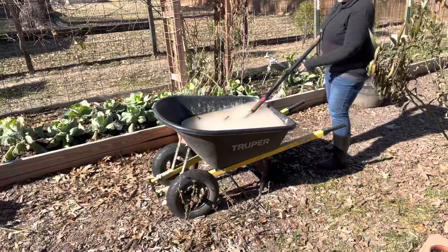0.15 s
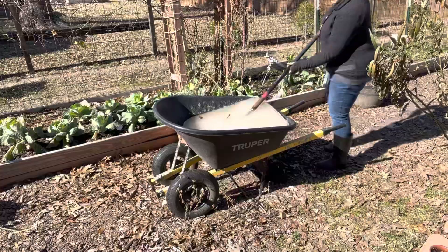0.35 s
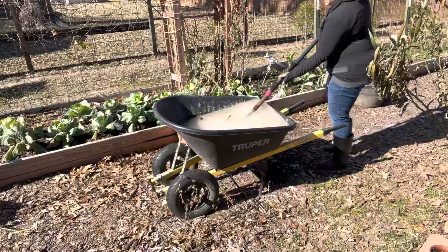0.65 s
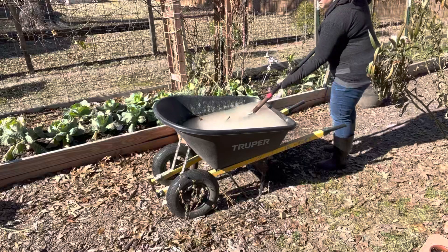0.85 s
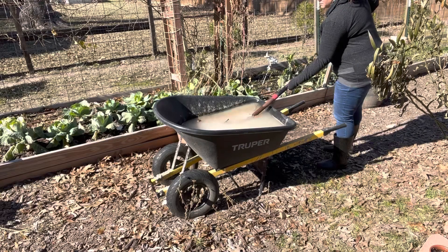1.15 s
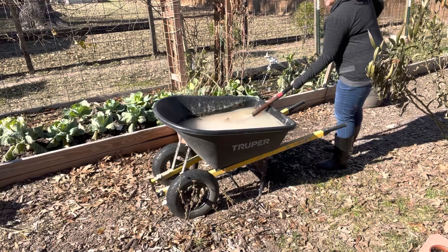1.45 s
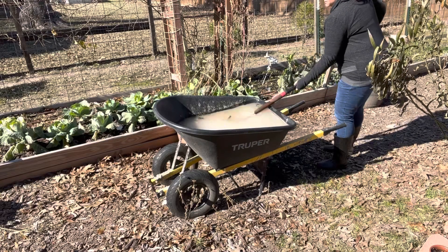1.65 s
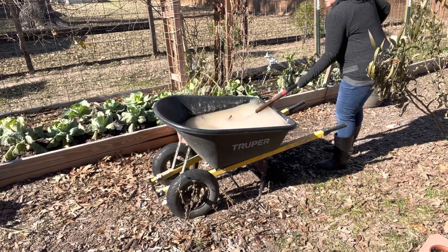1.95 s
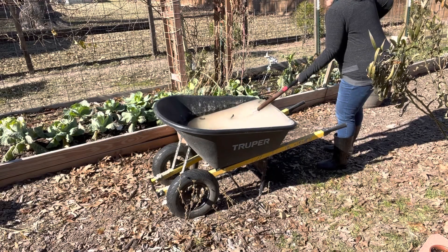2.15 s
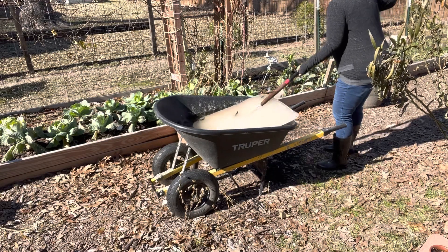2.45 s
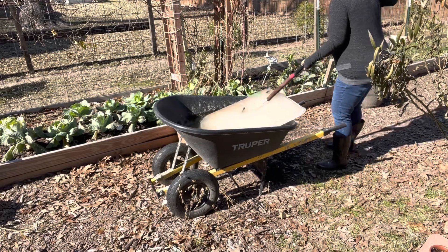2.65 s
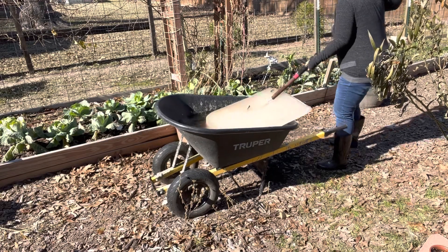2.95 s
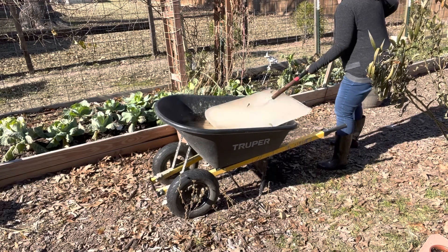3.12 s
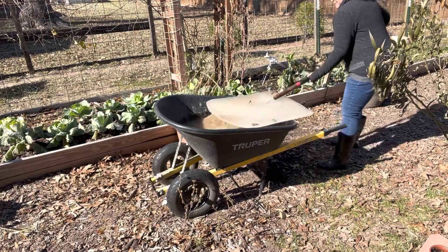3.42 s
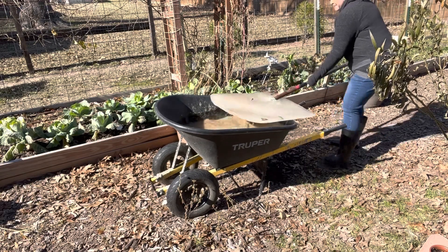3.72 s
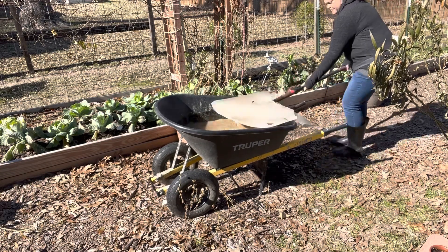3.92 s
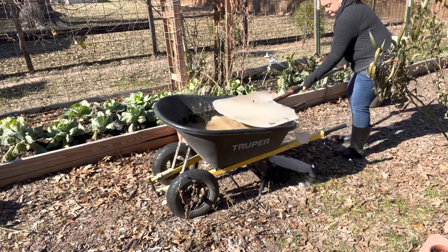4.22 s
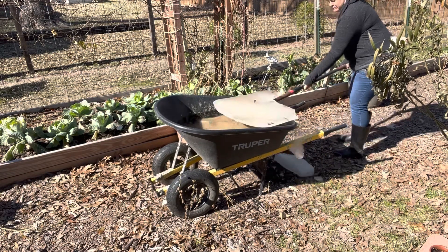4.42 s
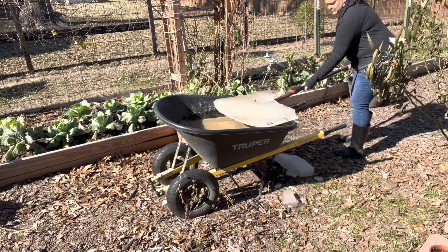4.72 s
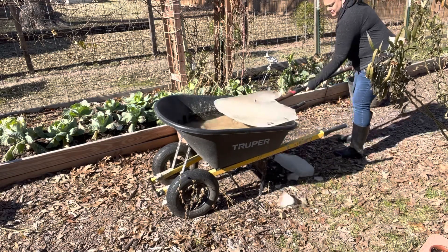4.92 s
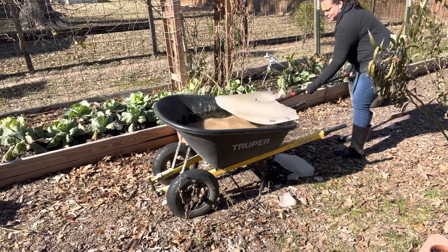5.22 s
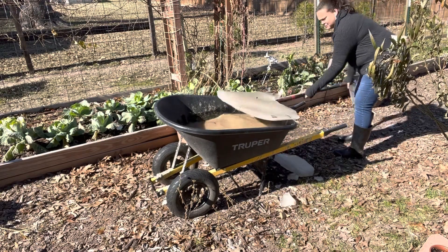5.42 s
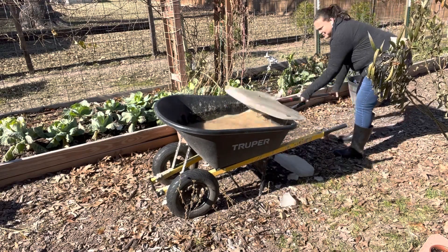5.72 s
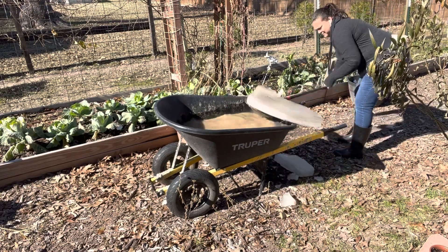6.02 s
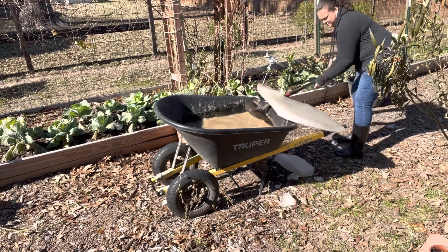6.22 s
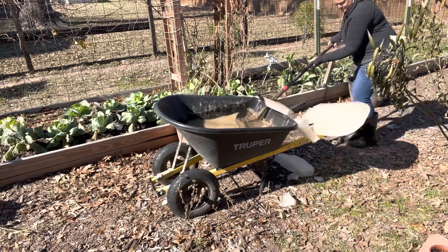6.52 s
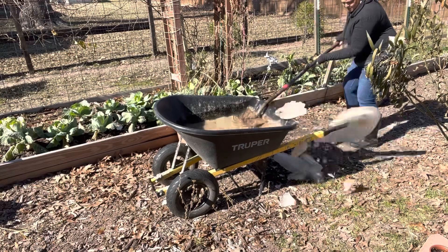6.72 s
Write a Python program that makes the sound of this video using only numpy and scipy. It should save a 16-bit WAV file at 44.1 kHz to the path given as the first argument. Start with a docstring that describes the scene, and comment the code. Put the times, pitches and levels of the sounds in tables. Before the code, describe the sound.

A steady low outdoor rumble with a trace of hiss lies beneath close, detailed stereo sound. From 0 to 1.3 s a shovel works at an ice slab in a plastic wheelbarrow: a soft bump, light gritty scraping, and a cluster of hard clacks and a watery plop near 0.6-0.8. Short falling chirps come at about 1.4, then hollow knocks at 1.6-1.7, 2.3 and 2.7, with tiny drips and ticks. Scraping strengthens near 3.8, and at 3.9-4.25 knocks, crisp leaf crackle, a faint steel ring and a low thud mark falling pieces. Small cracks follow to 4.65, then near quiet with a faint squeak at 5. Grinding returns from 5.6, growing rough at 6.1. A loud hollow knock hits at 6.23, heavy thuds and snaps at 6.4-6.55, then the hardest clacks and final thud at 6.7-6.85, with a short garden echo.

```python
"""A frozen slab is levered out of a plastic wheelbarrow with a shovel, in a garden.
The slab knocks (short fading tones), grinds (showers of tiny grains) and chirps (unsteady sliding tones).
Water plops beneath it, chips tick, the blade rings faintly, and pieces crash on dry leaves (noise bursts).
Two close microphone ports hear it with a short echo, over a low outdoor rumble made of coloured noise."""
import sys
import numpy as np
from scipy import signal
from scipy.fft import rfft, irfft, next_fast_len
from scipy.io import wavfile
from scipy.ndimage import uniform_filter1d

SR = 44100
rng = np.random.default_rng(int(sys.argv[2]) if len(sys.argv) > 2 else 0)


def unload_wav(signal):
    """Save mono or channel-first audio to the path in sys.argv[1] as 16-bit WAV at rate SR, clipped to [-1, 1]."""
    wavfile.write(
        sys.argv[1],
        SR,
        np.round(np.clip(np.atleast_2d(signal).T, -1, 1) * 32767).astype(np.int16),
    )


N = 302746
AGE = np.arange(SR // 8) / SR  # seconds since a short sound began

# Background. Spectra give the relative strength per hertz: f/Hz, level/dB
AIR_SPECTRUM = [(22, -18.5), (52, -1.5), (92, 2.5), (150, -10), (220, -20.5), (1400, -36.5), (2700, -81),
                (9000, -38.5), (15000, -102)]
AIR_DB = -49
ECHO_SPECTRUM = [(1500, 0.21), (15000, 0.35)]
ECHO_DB = -11.5

# The two ports, how alike they sound: f/Hz, likeness/0-1
PORT_LIKENESS = [(120, 0.93), (450, 0.61), (1200, 0.93), (3000, 0.31), (7000, 0.25), (9400, 0.92),
                 (15000, 1)]
# The two ports, how far the left leads (below the first f the lead shrinks towards 0): f/Hz, lead/rad
PORT_LEAD = [(1500, 0.6), (2600, -2.1), (4200, -1.5), (6500, -5), (8000, -2), (9500, -3), (15500, -2.5)]
TOP_HZ = 15900  # upper band limit

# Bubbles, drops and small pitched ticks of chips: t/s, level/dB, f/Hz, decay/s
PLOPS = [(0.657, -35.5, 1280, 0.0044), (1.103, -33, 1217, 0.0026), (1.847, -33, 3370, 0.00085),
         (1.866, -35, 1370, 0.0014), (1.958, -41.5, 1350, 0.0039), (1.994, -40.5, 3370, 0.00098),
         (2.114, -42, 3270, 0.0017), (2.536, -40, 797, 0.023), (3.514, -40.5, 2650, 0.0063),
         (3.529, -43.5, 1036, 0.018), (5.24, -46, 1064, 0.015), (5.366, -49.5, 1460, 0.0066)]
PLOP_TICK_DB = -52.5  # faint click at the start of each, before colouring

# Heavy pieces land: t/s, level/dB, f/Hz, time to swell/s
THUDS = [(4.238, -21, 120, 0.0068), (6.44, -10.5, 180.7, 0.0042), (6.549, -26, 127, 0.012),
         (6.844, -10.5, 114, 0.0031)]

# Blows that ring the steel blade: t/s, level/dB
BLADE_BLOWS = [(4.015, -29.5), (4.109, -34), (6.545, -26.5), (6.592, -44)]
# Tones of the blade: f/Hz, relative level/dB, time to fall by 60 dB/s
BLADE_TONES = [(1030, -5, 0.15), (1617, -6, 0.36), (1653, -5, 0.64), (1827, -3, 0.24), (3330, -11.5, .25),
               (4080, -10, 0.22), (4830, -17, .22)]

# The loudest brittle snaps: t/s, level before colouring/dB, decay/s
SNAPS = [(0.804, -41.5, 0.027), (1.166, -43, 0.023), (1.304, -28.5, 0.0018), (1.52, -38, 0.0033),
         (2.528, -34, 0.003), (2.874, -38, 0.0062), (3.073, -40.5, 0.012), (3.953, -28.5, 0.0018),
         (4.012, -20, 0.015), (4.344, -22.5, 0.0015), (4.3795, -29, 0.001), (4.638, -35, 0.0066),
         (6.274, -21.5, 0.0046), (6.413, -17, 0.0027), (6.52, -13, 0.0078), (6.615, -28, 0.0027),
         (6.826, -18.5, 0.0031)]
# Dry leaves are crushed with a thin, high crackle: t/s, level before colouring/dB, decay/s
CRACKLES = [(0.274, -37, 0.014), (4.014, -10.5, 0.0073), (4.1762, -15, 0.0088), (6.174, -16, 0.0081),
            (6.554, -11.5, 0.0052)]
CRACKLE_LOW_HZ = 9700
# Colour of ice, leaves and chips: f/Hz, relative level/dB
CRISP_SPECTRUM = [(500, -1), (2300, -2), (4000, -0.5), (8600, 1.5), (10000, -5), (13000, -13.5),
                  (15700, -3.5)]

# Colour of the rumble after a boom: f/Hz, relative level/dB
TUB_SPECTRUM = [(25, -27), (68, 1.5), (110, -3.5), (190, -3.0), (400, -16.5), (2000, -36.0)]
SHUDDER_DB = -17.5  # relative to the booms

# Pushes of the shovel that slide the slab: start t/s, length/s, grinding level/dB, rustle level/dB
STROKES = [(0.037, 0.046, -44.5, -45.5), (0.148, 0.51, -53.5, -63), (0.55, 0.24, -54.5, -55),
           (0.913, 0.12, -59.5, -56.5), (1.125, 0.73, -49, -61), (1.629, 0.051, -41.5, -48),
           (1.94, 0.66, -53.5, -61.5), (2.456, 0.66, -49, -58.5), (3.25, 1, -57, -53.5),
           (3.732, 0.55, -41.5, -42.5), (4.158, 0.28, -51, -44.5), (4.427, 0.42, -60, -55),
           (5.609, 0.49, -57.5, -60), (5.767, 0.3, -45, -55), (6.08, 0.27, -37, -61),
           (6.186, 0.51, -38.5, -44), (6.515, 0.067, -27.5, -34), (6.694, 0.25, -34.5, -34)]
STROKE_RISE_SHARE = 0.12  # of the length: a long push takes longer to get going
GRIND_FALL_S, RUSTLE_FALL_S = 0.045, 0.037  # fading after a push
REST_GRIND_DB, REST_RUSTLE_DB = -70, -67  # the slab never lies quite still
# Slips grow with the push: grinding level/dB, part of the sound power that comes in sudden slips/0-1
CATCHING = [(-44.5, 0.26), (-38.5, 0.37)]
# Colour of the slab grinding in the tub: f/Hz, relative level/dB
GRIND_SPECTRUM = [(90, -0.5), (200, -4.5), (400, 2.5), (600, -3), (950, -3.5), (1650, -11), (2500, -21),
                  (5000, -38)]

# The wet slab catches on the plastic and chirps: t/s, length/s, level/dB, middle pitch f/Hz
RUBS = [(1.392, 0.032, -32, 305.5), (1.452, 0.02, -38.5, 535), (1.469, 0.024, -34.5, 463),
        (4.969, 0.13, -54.5, 809)]

# A hard edge of ice strikes ice or steel: t/s, clack level/dB, clack f/Hz, crunch before colouring/dB, decay/s
CLACKS = [(0.6202, -23, 940, -52, 0.0053), (0.634, -34, 1150, -34.5, 0.0023),
          (0.698, -29.5, 980, -33.5, 0.0055), (0.77, -25.5, 1240, -28.5, 0.0023),
          (0.8291, -30.5, 996, -37, 0.0044), (1.643, -40, 1420, -51, 0.0093),
          (1.679, -27, 1620, -45, 0.0043), (2.216, -43, 1010, -46.5, .006),
          (2.67, -29.5, 1275, -36.5, 0.0099), (3.655, -36.5, 855, -41.5, 0.0053),
          (3.794, -32, 795, -33, 0.0085), (4.02, -18, 1036, -21, 0.0077), (4.1117, -14.5, 830, -46, 0.012),
          (4.153, -22.5, 930, -35, 0.01), (4.167, -26.5, 1070, -23.5, 0.0092),
          (4.2328, -15.5, 975, -48, 0.0026), (6.057, -45, 910, -39.5, 0.0043),
          (6.5445, -17.5, 979, -15.5, 0.0072), (6.706, -20, 1230, -20.5, 0.002),
          (6.723, -8.5, 885, -11, 0.0026), (6.7821, -17.5, 590, -30, 0.0017),
          (6.801, -27, 1180, -20, 0.005), (6.83, -14, 990, -21, 0.0023), (6.835, -16.5, 983, -19.5, 0.0056)]
EDGE_BOOM_DB, EDGE_BOOM_HZ = -15, 498  # such a tap hardly moves the tub; dB relative to its clack

# The slab bumps the tub: t/s, boom level/dB, tub f/Hz, slab f/Hz, hardness/0-1,
# delay of a second, weaker boom/s (0: none); the shortest ones merge with the first
KNOCKS = [(0.052, -34, 252, 894, 0.56, 0.0047), (1.386, -37, 318, 853, 0.49, 0.0049),
          (1.612, -35.5, 303, 643, 0.57, 0.037), (1.675, -25, 423, 775, 0.46, 0.0013),
          (1.706, -25.5, 320, 830, 0.57, 0), (1.796, -42, 400, 1440, 1, 0.0022),
          (2.317, -26.5, 395, 772, 0.71, 0), (2.7118, -22.5, 332, 720.6, 0.23, 0.039),
          (2.964, -37.5, 272, 662, 0, 0.0034), (3.115, -34.5, 230.1, 763, 0, 0.0038),
          (3.377, -42.5, 588, 695, 1, 0.0044), (3.866, -29, 235, 906.5, 0.4, 0),
          (3.913, -18.5, 218.1, 952.6, 0.56, 0.013), (4.002, -19, 380, 692, 0.33, 0.012),
          (4.111, -17, 436.6, 980, 0.67, 0), (4.445, -38.5, 416, 761, 0.69, 0),
          (4.6219, -33, 442, 927, 0.84, 0), (5.5105, -37, 289, 816, 0.39, 0.0017),
          (5.825, -34, 191.7, 1181, 0.79, 0.007), (5.971, -31, 206.3, 722, 0.58, 0.0033),
          (6.098, -23, 217.8, 959.5, 0.34, 0.00074), (6.2258, -11.5, 379.9, 953, 0.61, 0.00042),
          (6.256, -21, 267.5, 952, 0.61, 0.0011), (6.337, -24.5, 333, 779, 0.43, 0.0013),
          (6.412, -17.5, 447, 1079, 0.65, 0.0078), (6.521, -13, 331, 634, 0.33, .035)]
SECOND_DB, SECOND_PITCH = -4, 0.891  # second boom relative to the first: level change and pitch factor
# A hard contact is short and bright; a soft one is duller and lasts longer (dB relative to the boom)
HARD_CLACK_DB, SOFT_CLACK_DB = 4, -12
HARD_CRUNCH_DB, SOFT_CRUNCH_DB = 3, -32
HARD_DECAY_S, SOFT_DECAY_S = 0.0064, 0.013
BOOM_RISE_SHARE, CLACK_RISE_SHARE = 0.21, 0.072  # of the decay: softer contacts also start more slowly
CLINK_DB, CLINK_RATIO = -19, 3.7  # the slab's edge rings above its clack: level and pitch relative to it


def amp(db):
    """Turns dB into a gain."""
    return 10 ** (np.asarray(db) / 20)


def evened(x):
    """Scales to an rms (average strength) of 1."""
    return x / np.sqrt(np.mean(x ** 2) + 1e-20)


def read(points, hz):
    """Reads between table points, with frequency on a log scale."""
    f, value = np.transpose(points)
    return np.interp(np.log(hz + 1), np.log(np.abs(f) + 1), value)


def add(mix, s, sound):
    """Mixes a sound in at time s, in seconds."""
    part = mix[..., max(round(s * SR), 0):][..., :sound.shape[-1]]
    part += sound[..., :part.shape[-1]]


def coloured(pair, spectrum):
    """Colours two signals and blends them so that two unrelated ones become as alike as the ports."""
    size = next_fast_len(N + 4096)
    hz = np.fft.rfftfreq(size, 1 / SR)
    a, b = rfft(pair, size) * evened(amp(read(spectrum, hz)))
    alike = np.clip(read(PORT_LIKENESS, hz), 0, 1)
    common = a * np.sqrt((1 + alike) / 2)
    apart = b * np.sqrt((1 - alike) / 2)
    return irfft(np.array([common + apart, common - apart]), size)[:, :N]


def grains(count, per_s, spread_db):
    """Tiny random contacts of uneven size, as sparse clicks on two channels."""
    size = amp(spread_db * np.minimum(rng.exponential(1, count), 4))
    present = rng.random(count) < per_s / SR
    return evened(size * present * rng.standard_normal((2, count)))


def dying(x, decay, rise):
    """Makes x swell and die away, with the energy of a unit-rms sound of that decay."""
    x = x * np.exp(-AGE / decay) * (1 - np.exp(-AGE / rise))
    return evened(x) * np.sqrt(decay / 2 * SR / len(AGE))


def speckled(x, depth_db):
    """Every fragment has its own colour: a gain that varies in small patches of time and frequency."""
    z = signal.stft(x, nperseg=256)[2]
    patches = rng.standard_normal(z.shape[1:])
    for axis, size in ((0, 5), (0, 4), (1, 4), (1, 3)):  # axis 0 is frequency, 1 is time
        patches = uniform_filter1d(patches, size, axis)
    gain = evened(amp(depth_db * evened(patches)))
    return signal.istft(z * gain, nperseg=256)[1][:, :N]


def air():
    """Steady outdoor rumble with a trace of hiss, from coloured noise."""
    return amp(AIR_DB) * coloured(rng.standard_normal((2, N)), AIR_SPECTRUM)


def garden(x, t60=0.11):
    """Ground, bed boards and fence scatter a thin, short echo: many random copies that fade."""
    t = np.arange(SR // 2) / SR
    taps = rng.standard_normal((2, len(t))) * (rng.random((2, len(t))) < 2500 / SR)
    taps *= amp(-60 * t / t60) * (1 - np.exp(-t / 0.0023))
    taps /= np.linalg.norm(taps, axis=1, keepdims=True)
    tail = signal.fftconvolve(x.mean(0)[None], taps, axes=1)[:, :N]
    return coloured(tail, ECHO_SPECTRUM)


def plops():
    """Bubbles, drops and small ticks of chips ring briefly, each at one pitch."""
    out = np.zeros(N)
    for s, db, hz, decay in PLOPS:
        ring = np.sin(2 * np.pi * hz * AGE)
        add(out, s, amp(db) * dying(ring, decay, rise=0.00019))
    return out


def thuds():
    """The ground takes a heavy piece with a low swing that swells and dies smoothly."""
    out = np.zeros(N)
    for s, db, hz, swell in THUDS:
        push = (AGE / swell) ** 2 * np.exp(2 - 2 * AGE / swell)  # peaks at 1 after the swell time
        add(out, s, amp(db) * push * np.sin(2 * np.pi * hz * AGE))
    return out


def blade():
    """The steel blade rings at several fixed tones, each fading at its own pace."""
    t = np.arange(SR // 2) / SR
    ring = sum(amp(db - 60 * t / t60) * np.sin(2 * np.pi * hz * t) for hz, db, t60 in BLADE_TONES)
    out = np.zeros(N)
    for s, db in BLADE_BLOWS:
        add(out, s, amp(db) * ring)
    return out


def crunches(contacts):
    """Snaps, crushed leaves and blows set off showers of tiny fractures; each plop starts with a click."""
    out = np.zeros((2, N))
    for s, db, decay in SNAPS:
        shower = grains(len(AGE), per_s=4000, spread_db=-1.0)
        add(out, s, amp(db) * dying(shower, decay, rise=0.00029))
    thin = signal.butter(2, CRACKLE_LOW_HZ, "highpass", fs=SR)
    for s, db, decay in CRACKLES:
        shower = signal.lfilter(*thin, grains(len(AGE), per_s=18000, spread_db=1))
        add(out, s, amp(db) * dying(shower, decay, rise=decay / 10))
    for s, *_, db, decay in contacts:
        shower = grains(len(AGE), per_s=6000, spread_db=5.5)
        add(out, s - .0005, amp(db) * dying(shower, decay, rise=0.00098))  # just ahead of the blow
    for s, *_ in PLOPS:
        tick = dying(rng.standard_normal((2, len(AGE))), 0.0013, rise=0.00025)
        add(out, s, amp(PLOP_TICK_DB) * tick)
    return coloured(speckled(out, depth_db=4.0), CRISP_SPECTRUM)


def shudder(contacts, decay=0.074):
    """Tub and ground rumble on for a moment after each boom."""
    power, t = np.zeros(N), np.arange(SR // 4) / SR
    for s, boom_db, *_ in contacts:
        swell = np.exp(-t / decay) * (1 - np.exp(-t / 0.011))
        add(power, s, (amp(boom_db) * swell) ** 2)
    rumble = coloured(rng.standard_normal((2, N)), TUB_SPECTRUM)
    return amp(SHUDDER_DB) * np.sqrt(power) * rumble


def sliding():
    """Gains of grinding and rustle: each push takes hold, keeps its strength and dies away."""
    power = amp([[REST_GRIND_DB], [REST_RUSTLE_DB]]) ** 2 * np.ones(N)
    t = np.arange(SR) / SR
    for start, length, grind_db, rustle_db in STROKES:
        attack = np.minimum(t / (STROKE_RISE_SHARE * length), 1)
        release = np.exp(-np.maximum(t - length, 0) / np.array([[GRIND_FALL_S], [RUSTLE_FALL_S]]))
        add(power, start, (amp([[grind_db], [rustle_db]]) * attack * release) ** 2)
    return np.sqrt(power)


def slips(per_s, spread_db, decay, share):
    """A gain for steady rubbing plus sudden slips that die away; share is the slips' part of the power."""
    kicks = grains(N, per_s, spread_db)[0] ** 2
    power = signal.lfilter([1], [1, -np.exp(-2 / (decay * SR))], kicks)
    share = np.clip(share, 0, 1)
    return np.sqrt(1 - share + share * power / power.mean())


def friction(grind_gain, rustle_gain):
    """The slab grinds along the tub in uneven slips while leaves and chips rustle."""
    catching = np.interp(20 * np.log10(grind_gain), *np.transpose(CATCHING))
    grind = grains(N, per_s=4000, spread_db=-0.5)
    grind = grind * slips(per_s=210, spread_db=-1.0, decay=0.021, share=catching)
    rustle = grains(N, per_s=9000, spread_db=-5.0)
    rustle = rustle * slips(per_s=130, spread_db=4.5, decay=0.0055, share=0.46)
    grind = speckled(coloured(grind, GRIND_SPECTRUM), depth_db=4.0)
    rustle = speckled(coloured(rustle, CRISP_SPECTRUM), depth_db=4.0)
    return grind * grind_gain + rustle * rustle_gain


def ticks(gain, count, low_hz, high_hz, cycles, level_db, spread_db=3):
    """Small contacts ring for a few cycles at a random pitch, louder when the slab moves more."""
    out = np.zeros((2, N))
    for when, pitch, size, turn in rng.random((count, 4)):
        at = when * (N - 1) / SR
        hz = low_hz * (high_hz / low_hz) ** pitch
        db = level_db + spread_db * min(-np.log(1 - size), 3)
        out_of_step = np.array([[1], [-1]]) * (turn - .5)  # radians, opposite at the two ports
        ping = np.sin(2 * np.pi * hz * AGE + out_of_step)
        add(out, at, gain[int(at * SR)] * amp(db) * dying(ping, cycles / hz, rise=0.00052))
    return out


def rubs(sag=0.189, rough=0.068, overtone_db=-9, stutter_db_per_s=45, drift_per_s=0.47):
    """Stick and slip: an unsteady falling tone with two overtones; longer rubs stutter and drift more."""
    out = np.zeros(N)
    for s, length, db, hz in RUBS:
        done = np.minimum(AGE / length, 1)  # the pitch falls as the slab slows
        wobble = evened(uniform_filter1d(rng.standard_normal(len(AGE)), size=60))
        drift, stutter = evened(uniform_filter1d(rng.standard_normal((2, len(AGE))), size=500))
        pitch = hz * (1 + sag * (.5 - done) + rough * wobble + drift_per_s * length * drift)
        turns = np.cumsum(pitch) / SR
        tone = sum(amp(k * overtone_db) * np.sin(2 * np.pi * (k + 1) * turns) for k in range(3))
        flutter = evened(amp(stutter_db_per_s * length * stutter))
        add(out, s, amp(db) * np.sin(np.pi * done) * flutter * tone)
    return out


def blows():
    """Lists every contact, second ones too: t/s, boom/dB, boom/Hz, clack/dB, clack/Hz, crunch/dB, decay/s."""
    out = []
    for s, db, hz, crunch_db, decay in CLACKS:
        out.append((s, db + EDGE_BOOM_DB, EDGE_BOOM_HZ, db, hz, crunch_db, decay))
    for s, db, tub_hz, slab_hz, hardness, delay in KNOCKS:  # hardness blends soft into hard
        clack_db = np.interp(hardness, [0, 1], [SOFT_CLACK_DB, HARD_CLACK_DB])
        crunch_db = np.interp(hardness, [0, 1], [SOFT_CRUNCH_DB, HARD_CRUNCH_DB])
        decay = np.interp(hardness, [0, 1], [SOFT_DECAY_S, HARD_DECAY_S])
        touches = [(s, db, tub_hz)]
        if delay > 0:
            touches.append((s + delay, db + SECOND_DB, tub_hz * SECOND_PITCH))
        for at, level, hz in touches:
            out.append((at, level, hz, level + clack_db, slab_hz, level + crunch_db, decay))
    return out


def struck(hz, decay, rise, low_hz, high_hz, scatter, width, sag=0.11, damping=0.32, db_per_octave=-3):
    """A struck body: one main tone sagging in pitch amid a crowd of weaker ones; high ones die first."""
    place, start, offset = rng.random((3, 16, 1))
    step = (np.arange(len(place))[:, None] + place) / len(place)
    crowd_hz = low_hz * (high_hz / low_hz) ** step
    weight = amp(db_per_octave * np.abs(np.log2(crowd_hz / hz)))
    weight = weight * np.exp(AGE / decay * (1 - (crowd_hz / hz) ** damping))
    crowd = []
    for side in (-1, 1):  # each tone reaches the ports a little out of step
        turns = crowd_hz * AGE + start + side * width * (offset - .5)
        crowd.append((weight * np.sin(2 * np.pi * turns)).sum(0))
    pitch = hz * (1 + sag * (2 * np.exp(-AGE / decay) - 1))
    main = dying(np.sin(2 * np.pi * np.cumsum(pitch) / SR), decay, rise)
    return evened(main + scatter * dying(np.array(crowd), decay, rise)) * np.std(main)


def knocks(contacts):
    """Each blow gives a hard clack of the slab, a clink of its edge and a slower-rising hollow boom."""
    out = np.zeros((2, N))
    for s, boom_db, boom_hz, clack_db, clack_hz, _, decay in contacts:
        clack_rise = decay * CLACK_RISE_SHARE
        boom = struck(boom_hz, decay, rise=decay * BOOM_RISE_SHARE,
                      low_hz=163.6, high_hz=642.5, scatter=0.92, width=0.049)
        clack = struck(clack_hz, decay, rise=clack_rise,
                       low_hz=667.7, high_hz=2073, scatter=0.96, width=0.1)
        clink = struck(clack_hz * CLINK_RATIO, decay, rise=clack_rise / 2,
                       low_hz=2853, high_hz=5590, scatter=1.2, width=0.3)
        add(out, s, amp(boom_db) * boom + amp(clack_db) * (clack + amp(CLINK_DB) * clink))
    return out


def scene():
    """The work at the wheelbarrow, its short echo and the open air."""
    contacts = blows()
    grind_gain, rustle_gain = sliding()
    work = plops() + thuds() + blade() + crunches(contacts) + shudder(contacts)
    work = work + friction(grind_gain, rustle_gain)
    # the slab skips over grit
    work = work + ticks(grind_gain, count=330, low_hz=514, high_hz=1935, cycles=3.3, level_db=-3)
    # drops and chips land
    work = work + ticks(rustle_gain, count=400, low_hz=2807, high_hz=8100, cycles=9.1, level_db=-2.5)
    work = work + rubs() + knocks(contacts)
    return work + amp(ECHO_DB) * garden(work) + air()


def record(dry, bass_hz=40):
    """The ports lose the deepest bass and hear the treble out of step, the right louder; then a band limit."""
    size = next_fast_len(N + 4096)
    hz = np.fft.rfftfreq(size, 1 / SR)
    # long waves reach both ports together
    lead = read(PORT_LEAD, hz) * np.minimum(hz / PORT_LEAD[0][0], 1)
    low_cut = hz ** 2 / np.hypot(hz ** 2, bass_hz ** 2)
    shift = np.exp(1j * np.array([lead, -lead]) / 2)
    ports = irfft(rfft(dry, size) * low_cut * shift, size)[:, :N]
    edge = signal.firwin(255, TOP_HZ, window=("kaiser", 8), fs=SR)
    return signal.oaconvolve(ports * amp([[-.6], [.6]]), edge[None], "same")


dry = scene()
out = record(dry)
unload_wav(out)
```